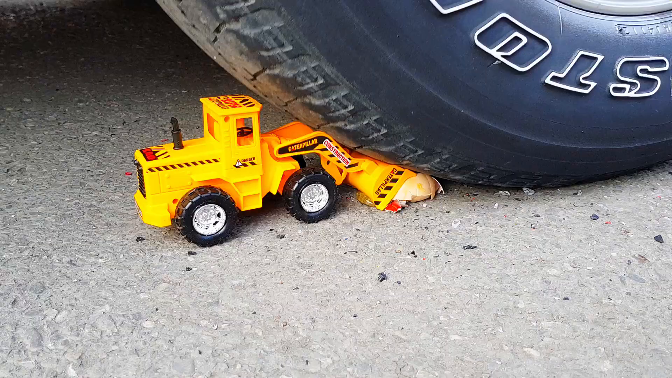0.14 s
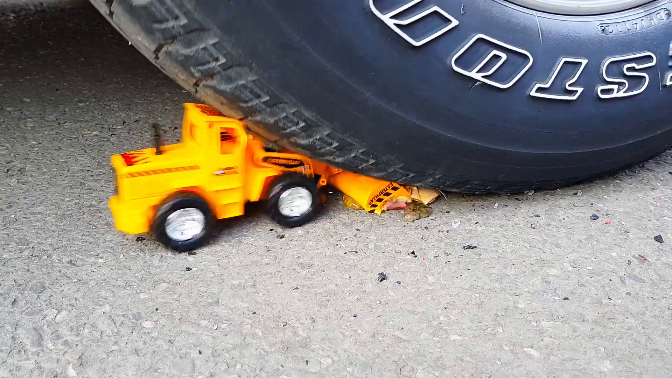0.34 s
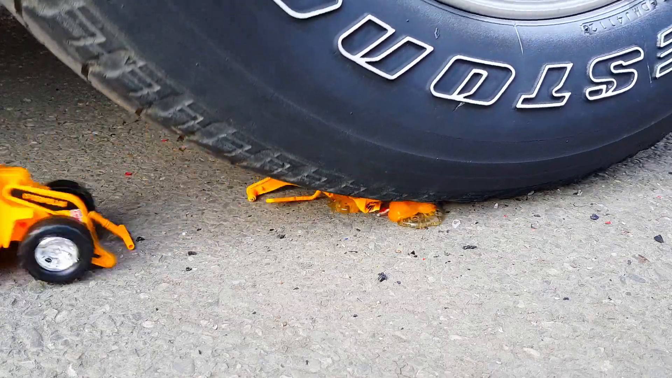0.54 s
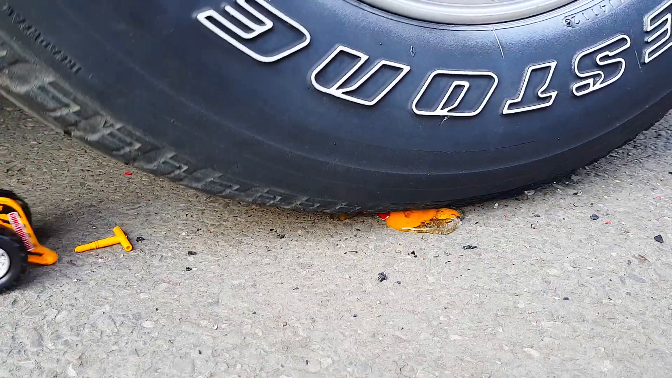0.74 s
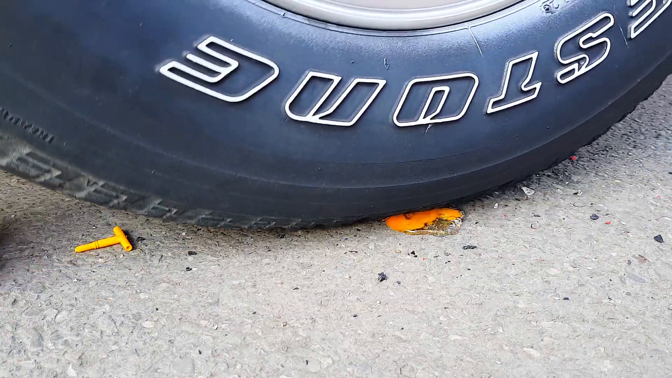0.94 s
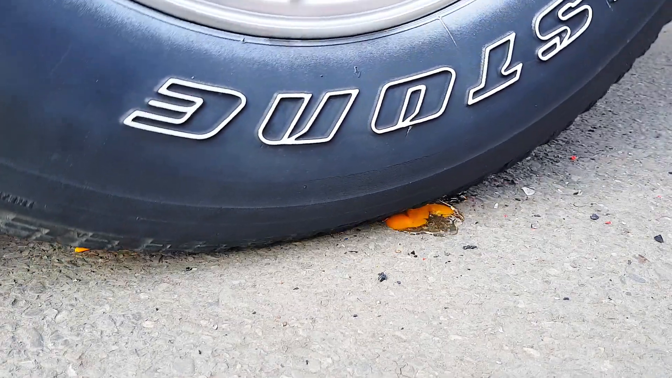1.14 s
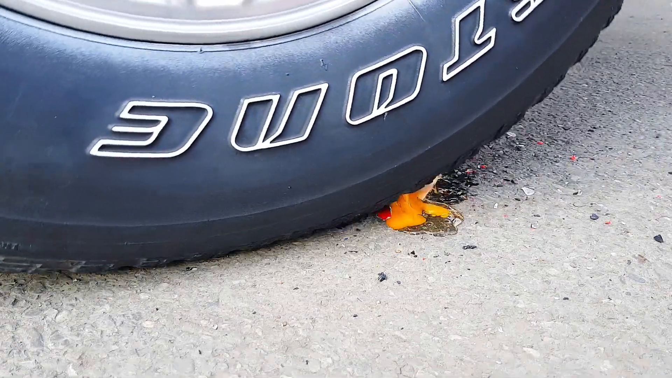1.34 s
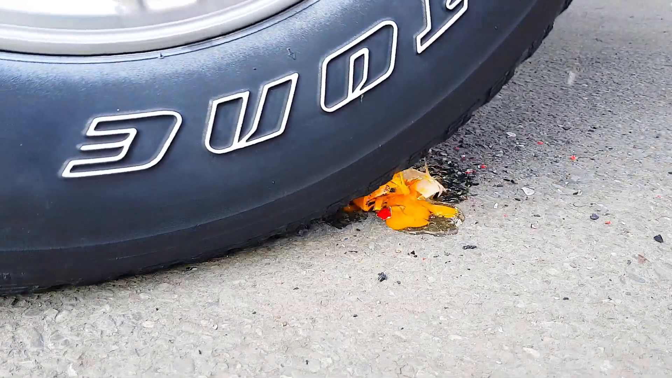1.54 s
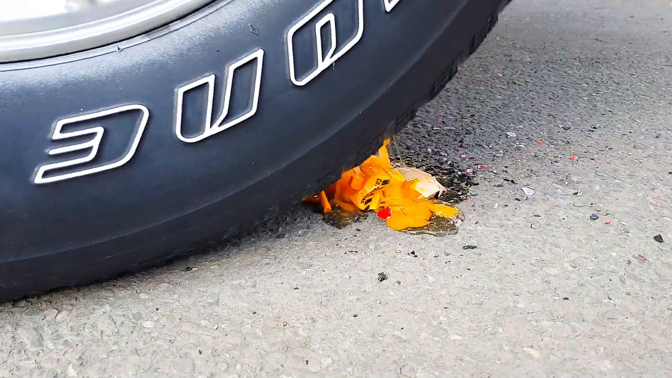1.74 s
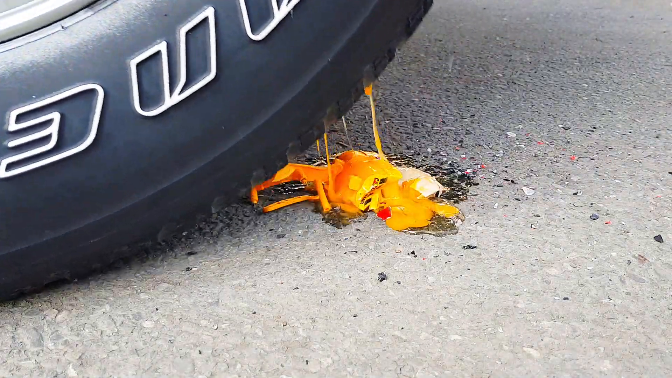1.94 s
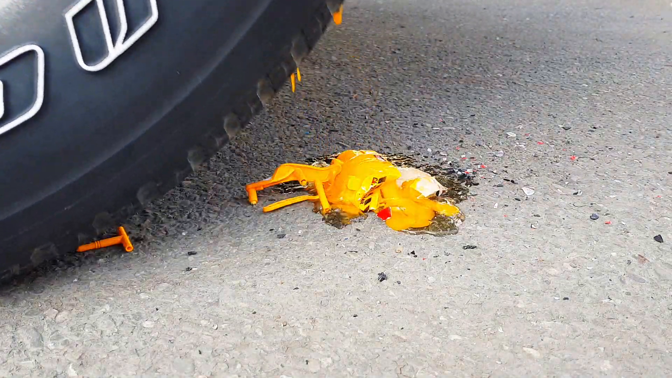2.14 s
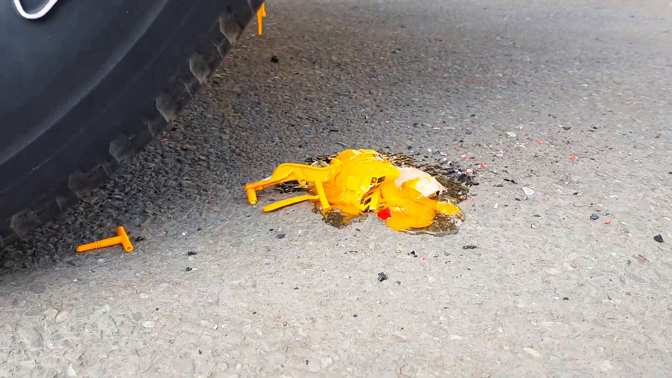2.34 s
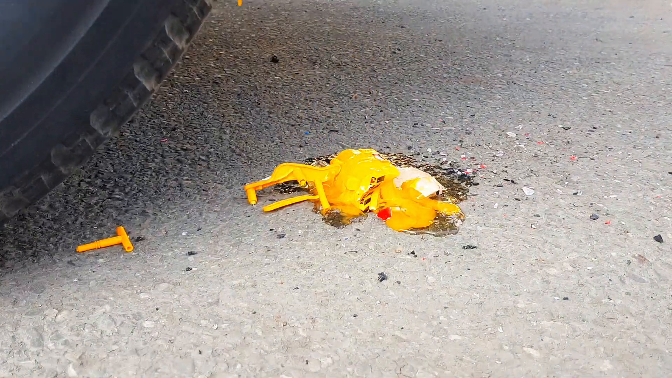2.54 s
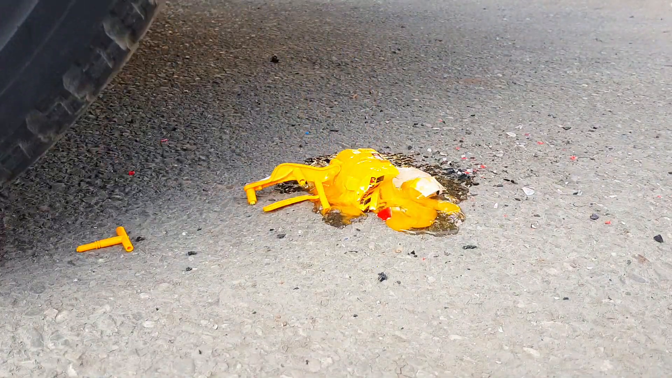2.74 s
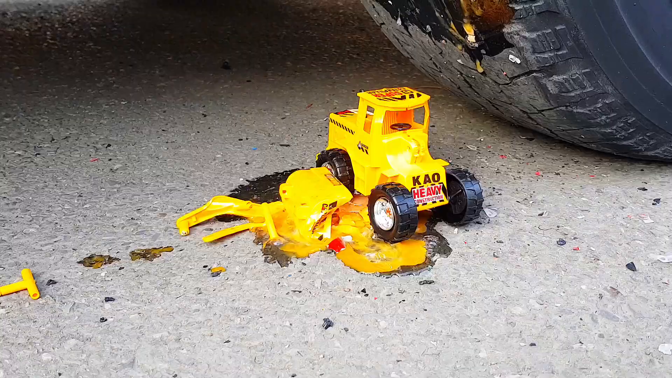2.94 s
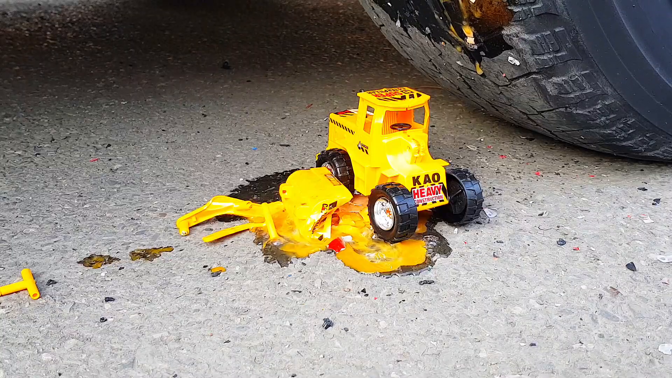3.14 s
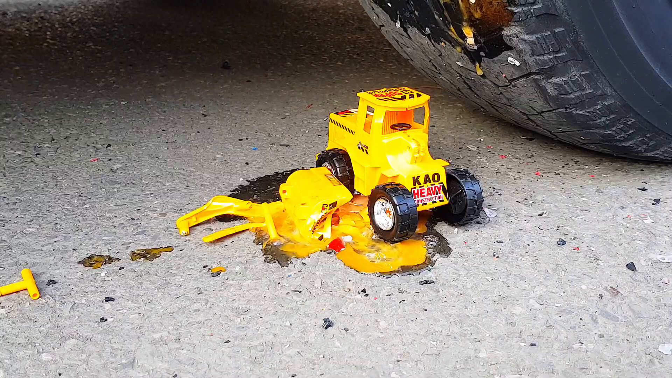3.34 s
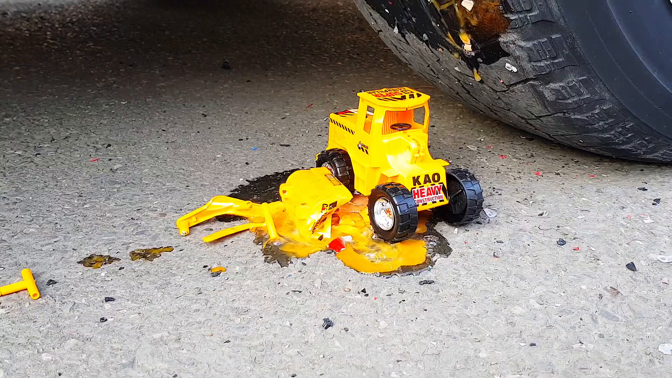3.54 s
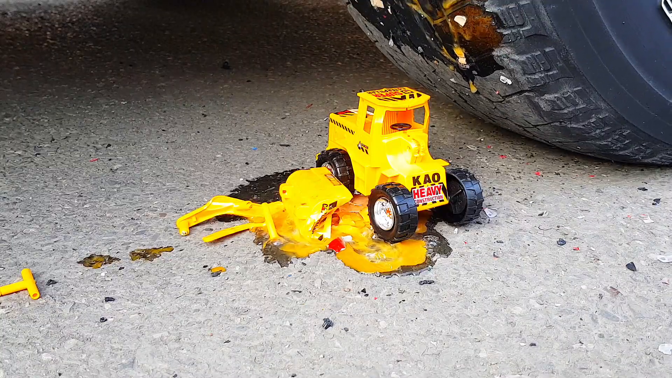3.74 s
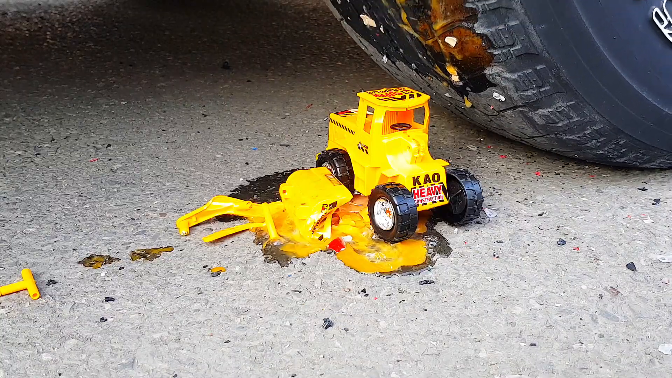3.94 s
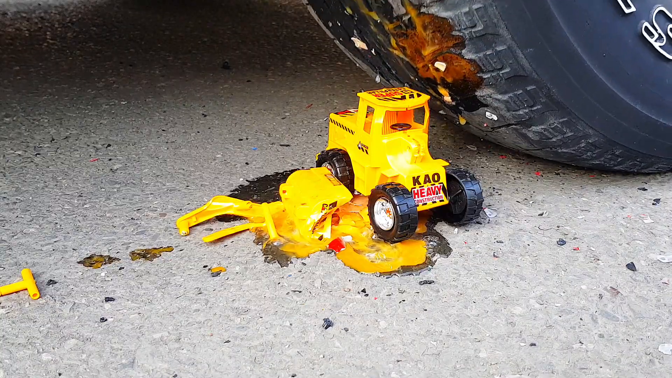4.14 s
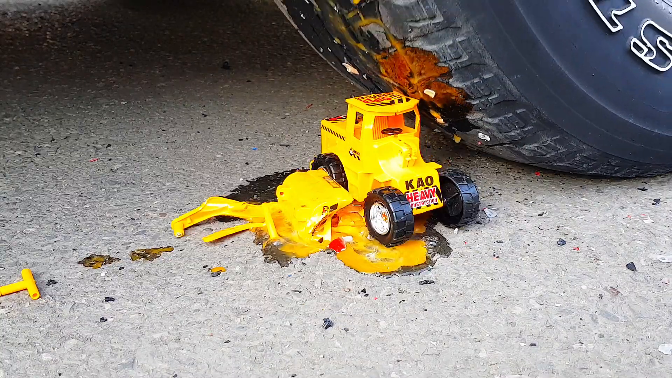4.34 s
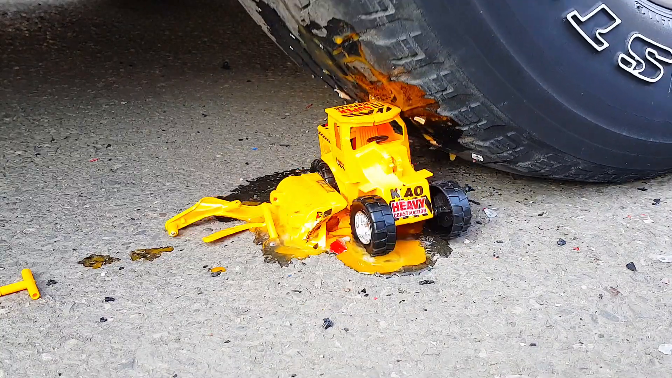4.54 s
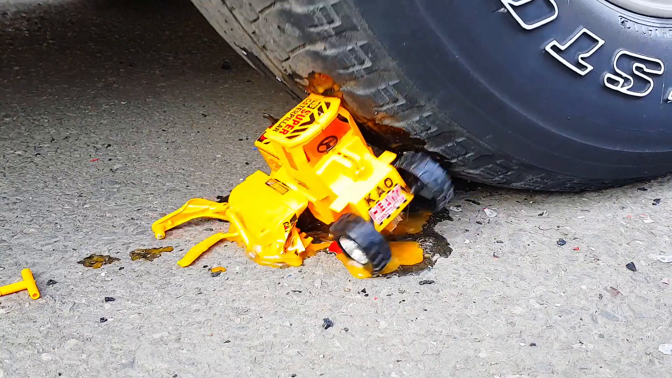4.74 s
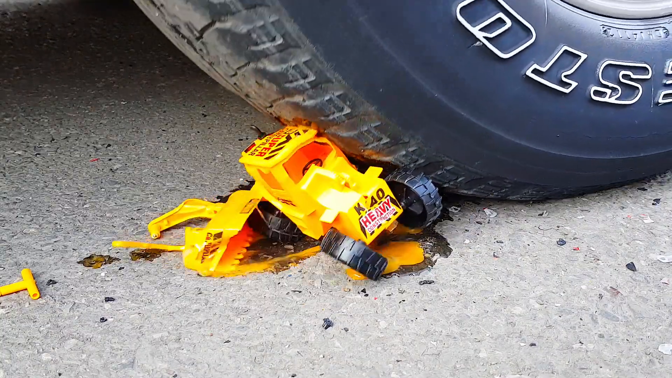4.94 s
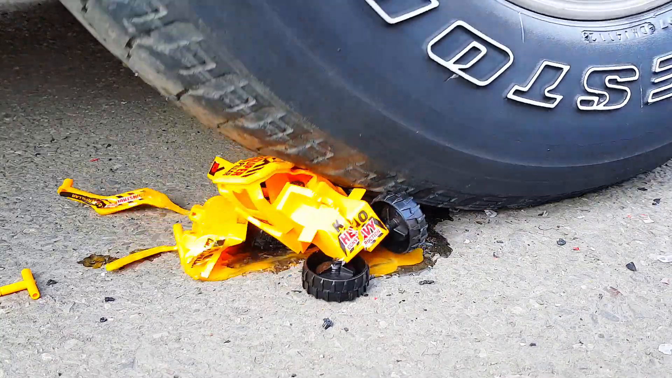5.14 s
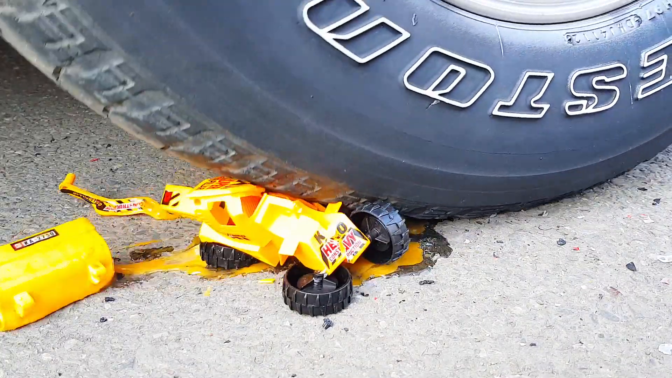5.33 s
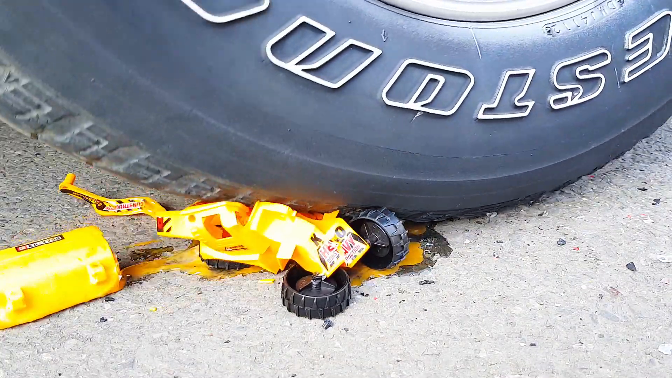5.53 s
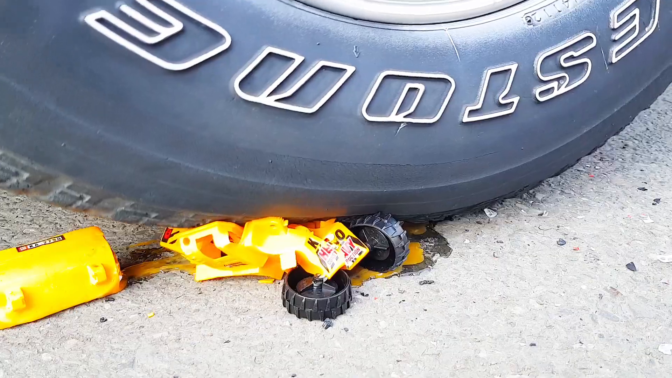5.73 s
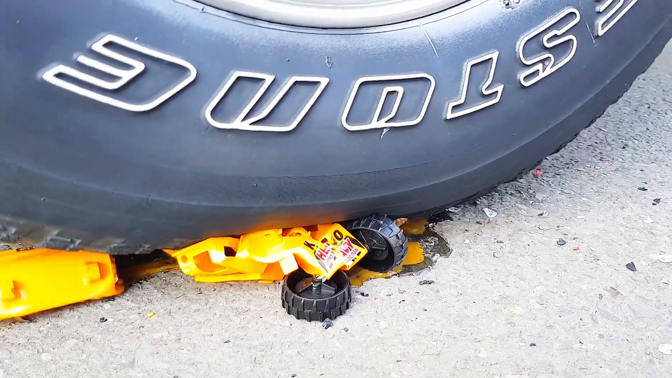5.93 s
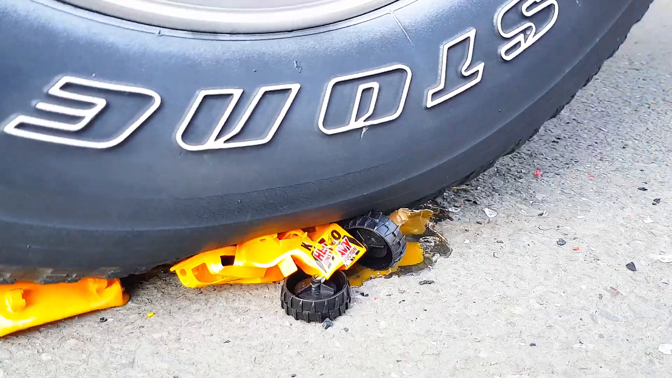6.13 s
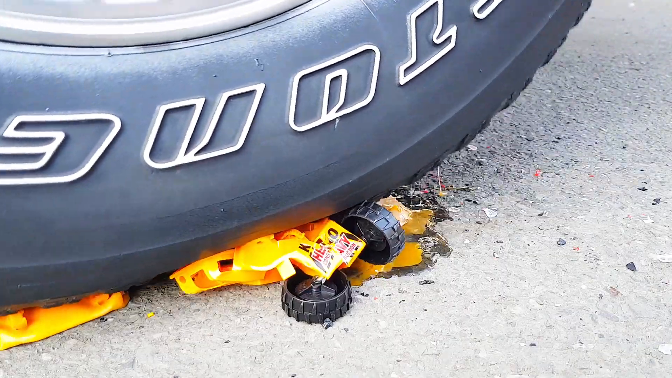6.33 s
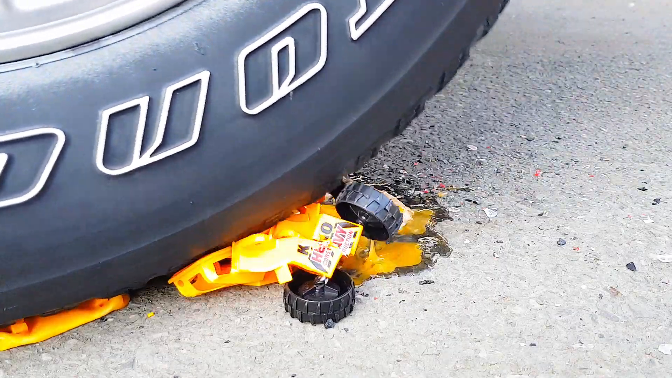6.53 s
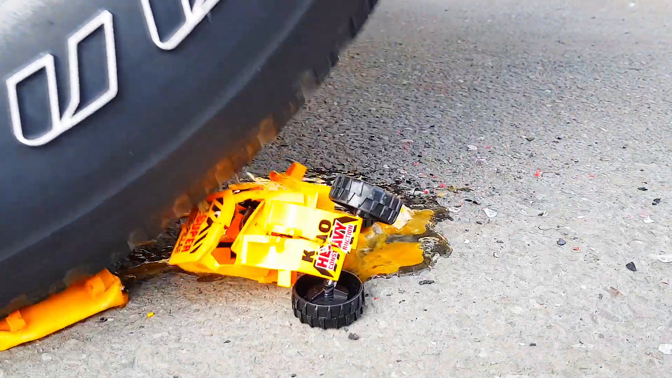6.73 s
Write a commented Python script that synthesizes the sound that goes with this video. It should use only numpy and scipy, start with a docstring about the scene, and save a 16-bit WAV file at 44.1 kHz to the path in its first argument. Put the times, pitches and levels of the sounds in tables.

```python
"""Plastic snaps under a slowly rolling car tyre in two bouts, close by: a toy and an egg on rough asphalt. Each
snap is a short noise crack that rings its piece and trails off in splintering; thuds and ticks follow. Random
resonant bursts make the shards crackle, noise puffs make the flakes tick, rough gliding tones creak. Noise
fluttering at the firing rate makes the engine tick, and faint unsteady tones hum twice. Behind, shaped noise
makes the idling engine rumble and hiss; near 2.9 s it abruptly gets louder."""
import sys
import numpy as np
from scipy import signal
from scipy.fft import rfft, irfft, next_fast_len
from scipy.io import wavfile

SR = 44100
rng = np.random.default_rng(int(sys.argv[2]) if len(sys.argv) > 2 else 0)


def log_audio(samples):
    """Write samples as a 16-bit WAV file to the path given in sys.argv[1]."""
    # one column per channel
    frames = np.atleast_2d(samples).T
    # limit to full scale, then quantise
    limited = np.clip(frames, -1, 1)
    pcm = np.round(limited * 32767).astype(np.int16)
    wavfile.write(sys.argv[1], SR, pcm)


N = 303408   # samples

# breaking pieces: start_s, body_level_db, body_pitch_hz, bright_tearing_level_db,
# splinter_level_db (against the crack); levels are drive, before the gains inside each layer
SNAPS = [(0.0034, -25.5, 1580, -35, -7.5), (0.024, -20.5, 2480, -13.5, -50),
         (0.0371, -32, 1170, -20.5, -4.5), (0.062, -25.5, 1210, -31, -17), (0.101, -59, 1490, -22, -13),
         (0.1213, -18.5, 1150, -15, -5.5), (0.2097, -38, 1700, -30, -2), (0.23, -43, 407, -37, -9),
         (0.245, -51, 2130, -27.5, -15), (0.263, -31, 1990, -26.5, -26), (0.269, -27.5, 2750, -46, -34),
         (0.2916, -15.5, 1200, -12.5, -6.5), (0.312, -17, 1310, -17.5, 1), (0.3286, -31, 1320, -21, -21),
         (0.3907, -28, 790, -24, 7), (0.42, -25.5, 1180, -20, -10), (0.466, -45, 1110, -31.5, -15),
         (0.511, -26, 2220, -35, -4.5), (0.543, -39, 1200, -28, -12), (0.5508, -27.5, 1790, -32.5, -3),
         (0.6522, -32, 2100, -35, -8), (0.787, -35, 2050, -56, -12), (1.322, -47, 1350, -47, 10.5),
         (1.3458, -33.5, 1490, -27, -3.5), (1.411, -38, 2160, -38, -6), (1.454, -36.5, 730, -43, -1),
         (1.5332, -36, 1300, -57, -5), (1.59, -29, 896, -48, -14), (1.5893, -16.5, 2300, -35, -20),
         (1.6375, -33, 1130, -58, -12), (1.67, -38.5, 1220, -55, -14), (1.707, -43, 940, -62, -6),
         (2.028, -25.5, 2060, -25, -10), (2.063, -39, 1900, -38, -21), (2.091, -34.5, 1950, -39, -8),
         (4.279, -39, 1220, -45, 8.5), (4.31, -27.5, 1150, -32.5, -1), (4.347, -36.5, 1820, -31.5, -6),
         (4.402, -17.5, 704, -25, -9), (4.406, -14.5, 1890, -38, -9), (4.431, -24.5, 2000, -47, -10),
         (4.469, -34.5, 1970, -45, 8.5), (4.4795, -18.5, 2430, -10.5, -13.5),
         (4.5386, -27, 2000, -36.5, 8.5), (4.5456, -17, 2050, -23, -31), (4.6139, -22, 1530, -36, -4),
         (4.6179, -18.5, 2800, -15.5, -3), (4.6374, -20.5, 1210, -36, -8), (4.846, -41, 800, -68, -20),
         (4.869, -17.5, 1480, -20, -13.5), (4.916, -33, 1650, -34.5, -14), (4.934, -22.5, 1330, -31.5, -12),
         (5.034, -23, 1050, -18, -14), (5.0356, -19.5, 1700, -21, -2.5), (5.115, -37, 2480, -30.5, -24),
         (5.1524, -20.5, 1950, -15, -7), (5.166, -18.5, 2120, -10.5, -12.5),
         (5.204, -21.5, 1580, -16.5, -3), (5.276, -21.5, 1150, -22, -11), (5.2785, -20.5, 2180, -30, -13),
         (5.3038, -20.5, 2000, -15.5, -4), (5.3684, -24.5, 380, -23, -24), (5.4386, -27, 1720, -21, -20),
         (5.4486, -26, 636, -15.5, -14), (5.4678, -14, 1570, -16.5, -11.5), (5.494, -43, 1550, -16.5, -19),
         (5.564, -22, 1520, -20, -47), (5.5738, -14, 595, -9.5, -9), (5.6259, -33, 654, -42, -13),
         (5.685, -21.5, 700, -21.5, -22), (5.718, -43, 835, -34, -24), (5.74, -42, 1240, -30.5, -28),
         (5.7661, -29.5, 770, -28, -26), (5.8067, -21, 2000, -29, -15.5), (5.9521, -24.5, 440, -34.5, -19),
         (6.0018, -19, 790, -28.5, -28), (6.045, -32, 595, -48, -14), (6.0589, -14.5, 710, -15.5, -19),
         (6.069, -29, 786, -46, -23), (5.961, -43, 1510, -32, -26), (6.0757, -26.5, 755, -20.5, -14.5),
         (6.19, -44.5, 1060, -51, -30), (6.2445, -35, 1350, -36.5, -20), (6.2778, -35, 1100, -57, -25),
         (6.524, -40, 630, -47, 0), (6.554, -48, 1070, -33.5, -19), (6.577, -35, 2410, -31.5, -14),
         (6.685, -38, 2170, -38, -1.5)]
# colour of breaking plastic: frequency_hz, level_db_per_hz
SHARD_SPECTRUM = [(180, 8), (300, 3.5), (1060, 1), (2300, 0.5), (3700, -5.5), (5800, -5.5), (8300, -12),
                  (11400, -5.5), (14900, -12), (16500, -13)]
# how alike left and right hear the shards: frequency_hz, likeness (0 to 1)
SHARD_LIKENESS = [(300, 0.63), (2000, 0.58), (12000, 0.023)]
# how much louder the shards are on the left: frequency_hz, difference_db
SHARD_LEFT_LOUDER = [(500, 5), (1400, 5.5), (4000, 8.5), (10000, 2.5), (14000, 11)]
# how alike left and right hear the engine and its ticking: frequency_hz, likeness (0 to 1)
ENGINE_LIKENESS = [(60, 0.94), (200, 0.93), (600, 0.74), (3000, 0.11), (12000, 0.062)]
# how much louder the engine and its ticking are on the left: frequency_hz, difference_db
ENGINE_LEFT_LOUDER = [(60, 5), (1000, 5), (15000, 11)]
ENGINE_LAG_S, SHARD_LAG_S = 0.00048, 0.00012   # the right port hears later
FIRING_HZ = 40.8


def from_db(db):
    """Decibels to gain."""
    return 10 ** (np.asarray(db) / 20)


def rms_one(x):
    """Scale to unit rms."""
    return x / np.sqrt(np.mean(x ** 2) + 1e-20)


def at_hz(points, hz):
    """Read a table on a log-frequency axis."""
    table_hz, values = np.array(points).T
    return np.interp(np.log(hz + 1), np.log(table_hz), values)


def in_time(rows):
    """Columns of a curve over seconds, one value a sample."""
    s, *columns = np.transpose(rows)
    return [np.interp(np.arange(N) / SR, s, column) for column in columns]


def drift(rate):
    """Slow random wander of rms 1; rate is its corner in Hz."""
    r = np.exp(-2 * np.pi * rate / SR)
    wander = signal.lfilter([1], [1, -2 * r, r * r], rng.standard_normal(N + SR))
    return rms_one(wander[SR:])   # skip the filter's start


def decay(x, t60):
    """Let every impulse die away exponentially, by 60 dB in t60 seconds."""
    return signal.lfilter([1], [1, -from_db(-60 / (t60 * SR))], x)


def fades(s, length, fade_s):
    """Fade in, hold, fade out."""
    t = np.arange(N) / SR
    return np.clip(np.minimum(t - s, s + length - t) / fade_s, 0, 1)


def resonance(x, hz, width_hz):
    """One broad resonance, gain about 1 on top."""
    r = np.exp(-np.pi * width_hz / SR)
    poles = [1, -2 * r * np.cos(2 * np.pi * hz / SR), r * r]
    return signal.lfilter([(1 - r * r) / 2, 0, (r * r - 1) / 2], poles, x)


def steep_resonance(x, hz, width_hz):
    """The same resonance twice over, for steeper sides."""
    return resonance(resonance(x, hz, width_hz), hz, width_hz)


def split(x, edge_hz):
    """Low and high parts of a sound, each at unit rms."""
    filters = [signal.butter(3, edge_hz, kind, fs=SR, output="sos") for kind in ("low", "high")]
    return [rms_one(signal.sosfilt(sos, x)) for sos in filters]


def stereo_noise(spectrum, likeness, left_louder, lag_s):
    """Coloured noise at two ports: partly shared, the right one later and quieter; mid rms 1."""
    size = next_fast_len(N)
    hz = np.arange(size // 2 + 1) * SR / size
    shared, own = rfft(rng.standard_normal((2, size))) * from_db(at_hz(spectrum, hz))
    alike = np.clip(at_hz(likeness, hz), 0, 1)
    tilt = from_db(at_hz(left_louder, hz) / 2)
    right = alike * shared + np.sqrt(1 - alike ** 2) * own
    right = right * np.exp(-2j * np.pi * hz * lag_s)
    pair = irfft(np.array([shared * tilt, right / tilt]), size)[:, :N]
    return pair / np.sqrt(np.mean(pair.mean(axis=0) ** 2))


def grains(per_s, spread_db, t60):
    """Envelope of random tiny fractures, each dying fast; rms 1."""
    sizes = from_db(spread_db * np.minimum(rng.exponential(1, N), 4))
    born = rng.random(N) < per_s / SR
    return rms_one(decay(sizes * born + 1e-18, t60))


def snaps(crack_t60=0.013, ring_cycles=6, ring_db=4.5, piece_db=6, chip_db=3):
    """A short broad crack that knocks the piece into a brief ring, then uneven splintering that stops soon."""
    splinter_s, splinter_growth = 0.048, 0.043   # length after a -21.5 dB snap; dB of length per dB of snap
    low, high = split(stereo_noise(SHARD_SPECTRUM, SHARD_LIKENESS, SHARD_LEFT_LOUDER, SHARD_LAG_S), 3900)
    # dull and bright fractures come independently
    low_jolts, high_jolts = [0.5 + 0.65 * grains(per_s=450, spread_db=2.8, t60=0.006) for _ in range(2)]
    # chips of two sizes
    chips_hz = rng.choice([5600, 11600], len(SNAPS)) * rng.uniform(0.89, 1.44, len(SNAPS))
    out, t = np.zeros((2, N)), np.arange(SR // 5) / SR
    for (s, body_db, body_hz, bright_db, splinter_db), chip_hz in zip(SNAPS, chips_hz):
        start = round(s * SR)
        at = slice(start, min(N, start + len(t)))
        age = t[:at.stop - at.start]
        crack = 1.716 * (1 - np.exp(-age / 0.000057)) * from_db(-60 * age / crack_t60)

        # loud snaps splinter slightly longer
        length = splinter_s * from_db(splinter_growth * (max(body_db, bright_db) + 21.5))
        fall_db = 32.0 * (age / np.clip(length, 0.01, 0.2)) ** 1.55
        splinter = from_db(splinter_db - fall_db) * (1 - np.exp(-age / 0.004))
        dull = (crack + 1.25 * splinter * low_jolts[at]) * low[:, at]
        bright = (crack + 1.25 * splinter * high_jolts[at]) * high[:, at]

        knock = resonance(crack * low[:, at], body_hz, 0.21 * body_hz)
        body = 0.66 * dull + from_db(piece_db) * knock
        # a small piece gives no bass
        body = signal.sosfilt(signal.butter(2, 0.28 * body_hz, "high", fs=SR, output="sos"), body)
        cycles = ring_cycles * (body_hz / 1000) ** 0.5   # to -60 dB: high pieces ring more cycles
        ring = np.sin(2 * np.pi * body_hz * age) * (1 - np.exp(-age * body_hz / 0.28))
        ring = ring * from_db(ring_db - 60 * age * body_hz / cycles) * [[1.3], [0.65]]   # louder on the left

        chip = resonance(crack * high[:, at], chip_hz, 0.21 * chip_hz)
        tearing = 0.77 * bright + from_db(chip_db) * chip
        out[:, at] += from_db(body_db) * (body + ring) + from_db(bright_db) * tearing
    return out


def thuds(hz=79.5, t60=0.14, level_db=-20.5):
    """Every snap pushes the tyre wall, which answers with a short low ring of random strength."""
    s, body_db = np.array(SNAPS)[:, :2].T
    push = np.zeros(N)
    push[(s * SR).astype(int)] = from_db(body_db + level_db) * rng.standard_normal(len(s))
    r, w = from_db(-60 / (t60 * SR)), 2 * np.pi * hz / SR
    wall = signal.lfilter([0, np.sin(w)], [1, -2 * r * np.cos(w), r * r], push + 1e-18)
    return wall * [[1.3], [0.65]]


def settling(settle_t60=0.27, share=0.49):
    """After each snap the strained pieces go on ticking faintly, less and less."""
    s, bright_db = np.array(SNAPS)[:, 0], np.array(SNAPS)[:, 3]
    strain = np.zeros(N)
    strain[(s * SR).astype(int)] = from_db(share * bright_db)   # level differences between snaps are halved
    strain = decay(strain, settle_t60)
    ticks = from_db(-39) * (0.3 + grains(per_s=150, spread_db=2.5, t60=0.012))
    return strain * ticks * stereo_noise(SHARD_SPECTRUM, SHARD_LIKENESS, SHARD_LEFT_LOUDER, SHARD_LAG_S)


def crackle(cycles=6.3, low_hz=800, high_hz=14000):
    """Small shards of shell and plastic break at random, each burst ringing briefly at one of 16 pitches."""
    # loudness of the shards: time_s, level_db
    shard_level = [(0, -61), (.15, -36), (.45, -42.5), (.6, -50), (.75, -61.5), (1.0, -53.5), (1.35, -70),
                   (1.5, -46), (1.8, -55), (2.2, -58.5), (4.2, -57), (4.35, -59), (4.65, -47), (4.8, -51),
                   (6.3, -68), (6.55, -45.5), (6.88, -61.5)]
    level_db, = in_time(shard_level)
    lag = round(SHARD_LAG_S * SR)
    out = np.zeros((2, N))
    for hz in np.geomspace(low_hz, high_hz, 16):
        breaks = grains(per_s=45, spread_db=3.0, t60=0.0065) * rng.standard_normal((2, N))
        right = np.roll(0.26 * breaks[0] + 0.96 * breaks[1], lag)   # mostly its own noise
        pair = np.array([breaks[0], right])
        side = from_db(at_hz(SHARD_LEFT_LOUDER, hz) / 2 * np.array([[1], [-1]]))
        band_gain = from_db(at_hz(SHARD_SPECTRUM, hz)) * np.sqrt(hz)   # bands widen with pitch
        out += rms_one(resonance(pair, hz, hz / cycles)) * side * band_gain
    return from_db(level_db) * rms_one(out)


def peels(t60=0.016, width_share=0.3):
    """Flakes of shell and plastic come off: each tick is a short puff of noise in one bright resonance."""
    # thin bright ticks: start_s, level_db (before panning), ring_hz
    flakes = [(.638, -36, 6250), (1.0116, -44, 6910), (1.331, -48, 5800), (1.341, -36, 5850),
              (1.369, -41, 7750), (1.476, -32.5, 5550), (1.484, -37, 5500), (1.497, -38, 5800),
              (1.626, -41.5, 6100), (1.755, -39, 10900), (4.78, -31.5, 12100), (5.794, -33, 7500),
              (5.8184, -39, 10400), (5.916, -43, 6160), (6.1674, -48, 9000), (6.48, -40, 11000)]
    age, out = np.arange(SR // 40) / SR, np.zeros((2, N))
    for (s, db, hz), puff in zip(flakes, rng.standard_normal((len(flakes), 2, len(age)))):
        at = round(s * SR)
        tick = rms_one(steep_resonance(puff, hz, width_share * hz))
        out[:, at:at + len(age)] += from_db(db - 60 * age / t60) * tick * [[1.8], [0.9]]
    return out


def creaks():
    """Bent plastic slips unevenly, roughening the level of a tone whose pitch sags and comes back."""
    # creaking pieces: start_s, length_s, pitch_hz, midway_sag_hz, level_db (before grip and panning)
    bent_pieces = [(0.53, 0.08, 1132, 30, -46), (4.693, 0.035, 1175, 30, -54),
                   (4.726, 0.0536, 1215, 140, -46)]
    slips = grains(per_s=230, spread_db=4.0, t60=0.011) * rng.standard_normal(N)
    smooth_slips = signal.lfilter([1], [1, -np.exp(-np.pi * 120 / SR)], slips)
    grip = 0.45 + 0.9 * rms_one(smooth_slips)
    t, out = np.arange(N) / SR, 0
    for s, length, hz, sag_hz, db in bent_pieces:
        pitch = hz - sag_hz * np.sin(np.pi * np.clip((t - s) / length, 0, 1)) ** 2
        tone = np.sin(2 * np.pi * np.cumsum(pitch) / SR)
        out = out + from_db(db) * fades(s, length, fade_s=0.0089) * grip * tone
    return out * [[1.8], [0.9]]


def ticking():
    """The engine ticks in time with its firings, unevenly, ringing near 1.3 and 2 kHz."""
    # loudness of the ticking: time_s, level_db (before a 1 dB lift)
    ticking_level = [(0, -60), (.45, -40.5), (.68, -59.5), (1.3, -59.5), (1.45, -43.5), (1.7, -58.5),
                     (2.1, -46), (2.4, -53), (2.93, -60.5), (4.25, -72), (4.4, -43), (4.8, -57), (5.25, -66),
                     (6.55, -75), (6.88, -84)]
    # colour of the ticking: frequency_hz, level_db_per_hz
    ticking_spectrum = [(700, -15), (1300, 1), (2050, -4), (4200, -12), (5600, -7), (8000, -17), (16000, -13)]
    # resonances the ticks ring in: centre_hz, width_hz, gain_db
    ticking_resonances = [(1270, 260, 8), (2050, 600, 12)]
    level_db, = in_time(ticking_level)
    turns = np.floor(FIRING_HZ * np.arange(N) / SR + 0.39 * drift(9.0))
    beats = (np.diff(turns, prepend=0) > 0) * from_db(2.4 * drift(38.0))
    flutter = rms_one(decay(beats + 1e-18, t60=0.03))
    noise = stereo_noise(ticking_spectrum, ENGINE_LIKENESS, ENGINE_LEFT_LOUDER, ENGINE_LAG_S)
    pulsed = noise * (0.3 + 0.9 * flutter)
    gap = sum(from_db(db) * steep_resonance(pulsed, hz, width) for hz, width, db in ticking_resonances)
    return rms_one(pulsed + gap) * from_db(level_db + 1.0)


def hum():
    """Slightly unsteady faint tones under the loaded tyre, as sines with a wandering phase."""
    # hums: start_s, length_s, pitch_hz, level_db (before panning)
    tones = [(4.6, 0.2, 376, -58), (5.063, 0.85, 186, -55)]
    t, waver = np.arange(N) / SR, drift(5.7)
    out = 0
    for s, length, hz, db in tones:
        tone = np.sin(2 * np.pi * hz * t + hz / 235 * waver)
        out = out + from_db(db) * fades(s, length, fade_s=0.041) * tone
    return out * [[1.9], [0.95]]


def engine(hiss_under_rumble_db=13.5):
    """Lumpy exhaust rumble, and a hiss with wavering whines that pulses faintly with the firings."""
    # loudness of the idling engine, with a jump near 2.9 s: time_s, rumble_level_db
    idle_level = [(0, -40), (.45, -40.5), (.68, -41.5), (1.7, -46), (2.0, -41.5), (2.5, -45.5), (2.93, -39),
                  (2.95, -33), (4.4, -32.5), (4.63, -37), (4.69, -46), (4.95, -48.5), (5.25, -44),
                  (5.9, -50), (6.55, -48), (6.88, -46.5)]
    # colour of the rumble: frequency_hz, level_db_per_hz
    rumble_spectrum = [(13, -56), (29, -15), (40, -1), (70, 1.5), (90, -5), (118, 1.5), (150, -8.5),
                       (216, -12), (422, -19), (800, -23), (1000, -28), (1300, -34.5), (2200, -120)]
    # colour of the hiss: frequency_hz, level_db_per_hz
    hiss_spectrum = [(290, -19), (500, -3.5), (900, -8), (2000, -7.5), (3300, -10.5), (5200, -17),
                     (6500, -13.5), (8000, -22), (9500, -22), (11900, -14.5), (15700, -21.5), (16500, -35)]
    # engine-bay resonances: centre_hz, width_hz, level_db (over the hiss, when the engine is loud)
    bay_whines = [(1480, 76, -13), (2440, 460, -5)]
    rumble_db, = in_time(idle_level)
    hiss_db = rumble_db - hiss_under_rumble_db
    rumble = stereo_noise(rumble_spectrum, ENGINE_LIKENESS, ENGINE_LEFT_LOUDER, ENGINE_LAG_S)
    rumble = rumble * from_db(rumble_db + 1.98 * drift(1.32))
    firing = np.cos(2 * np.pi * FIRING_HZ * np.arange(N) / SR + 2.4 * drift(0.57))
    hiss = stereo_noise(hiss_spectrum, ENGINE_LIKENESS, ENGINE_LEFT_LOUDER, ENGINE_LAG_S)
    whines = sum(rms_one(steep_resonance(hiss, hz, width)) * from_db(over_db + 1.3 * drift(4.4))
                 for hz, width, over_db in bay_whines)
    facing = from_db(np.minimum(hiss_db + 42.5, 0))   # the whines stand out only when the engine is loud
    hiss_gain = from_db(hiss_db + 0.34 * firing + 1.96 * drift(5.6))
    return rumble + (hiss + facing * whines) * hiss_gain


def scene():
    """Snaps with their thuds and settling, crackle, peeling and creaks over engine ticking, hum and engine."""
    breaking = snaps() + thuds() + settling() + crackle() + peels() + creaks()
    return breaking + ticking() + hum() + engine()


def record(dry):
    """Peaks are rounded, then the top is cut above 17.1 kHz."""
    rounded = np.tanh(dry)
    return signal.sosfilt(signal.cheby2(12, 70, 17100, fs=SR, output="sos"), rounded)


dry = scene()
out = record(dry)
log_audio(out)
```